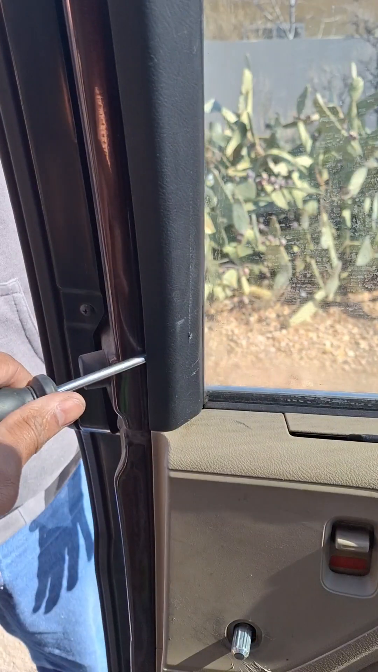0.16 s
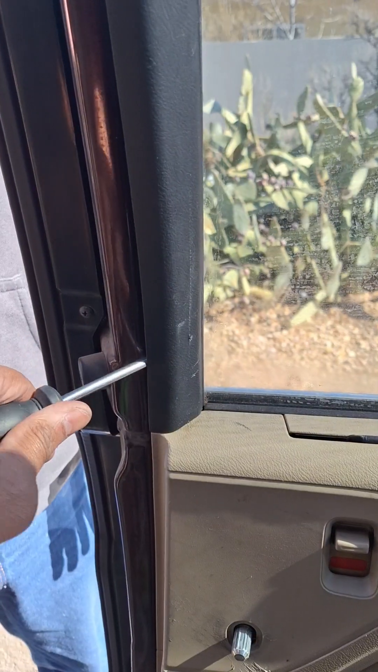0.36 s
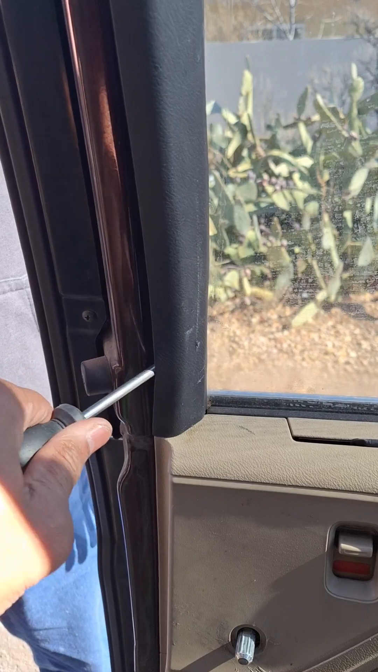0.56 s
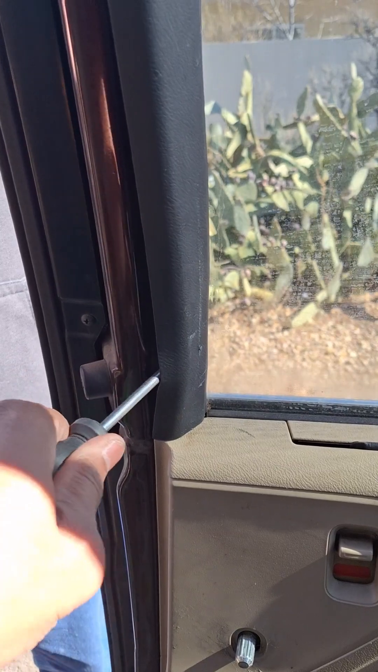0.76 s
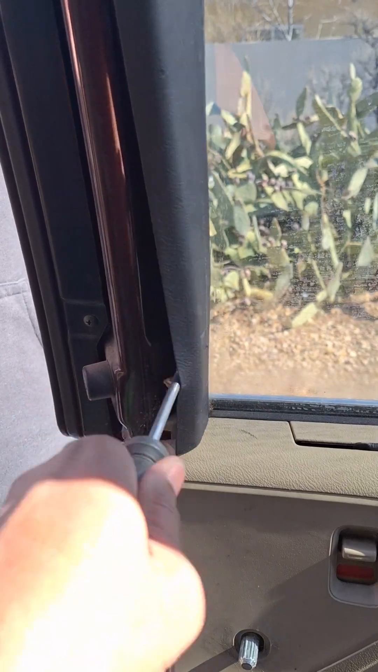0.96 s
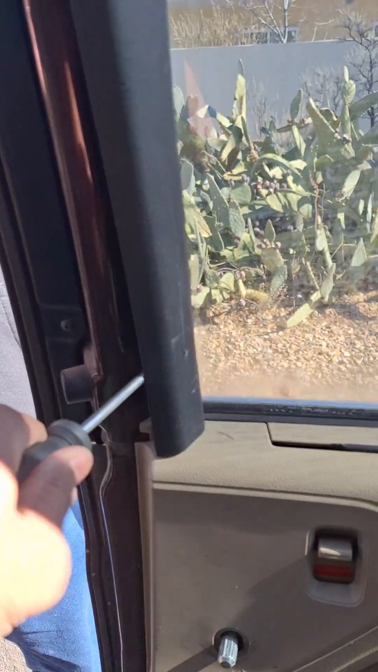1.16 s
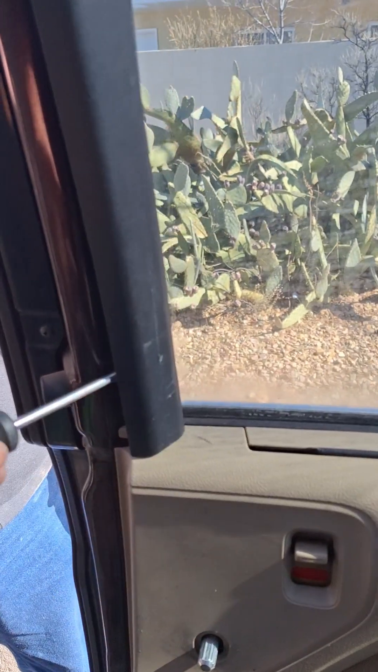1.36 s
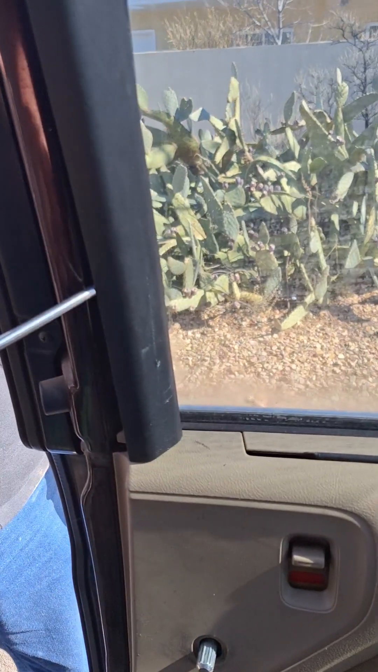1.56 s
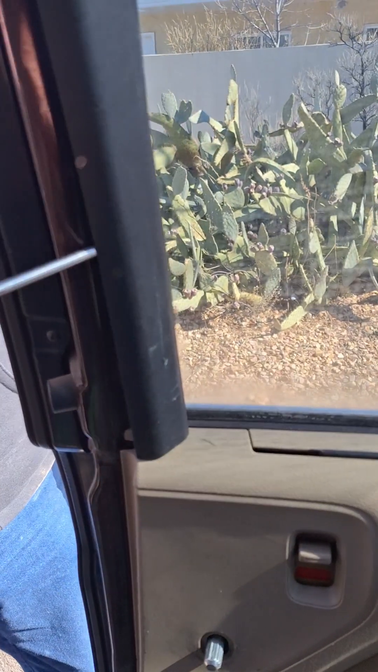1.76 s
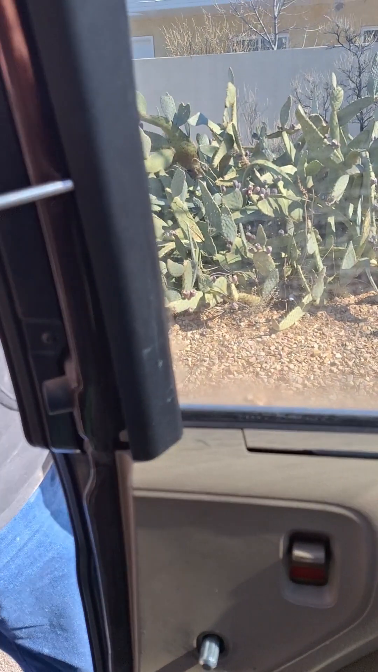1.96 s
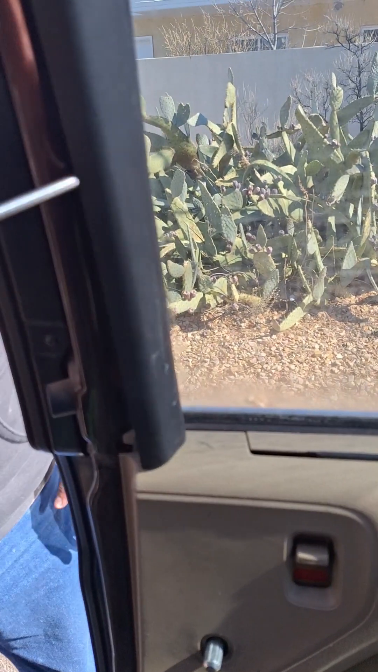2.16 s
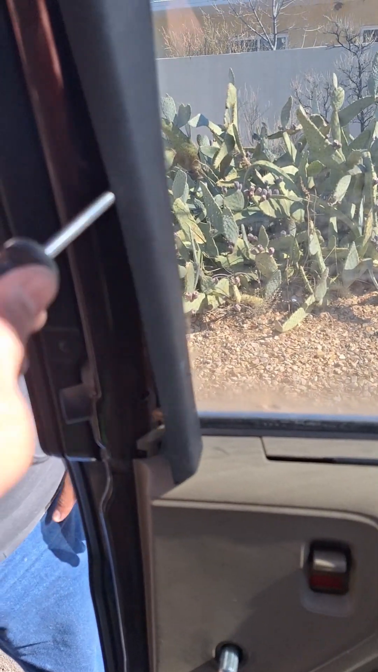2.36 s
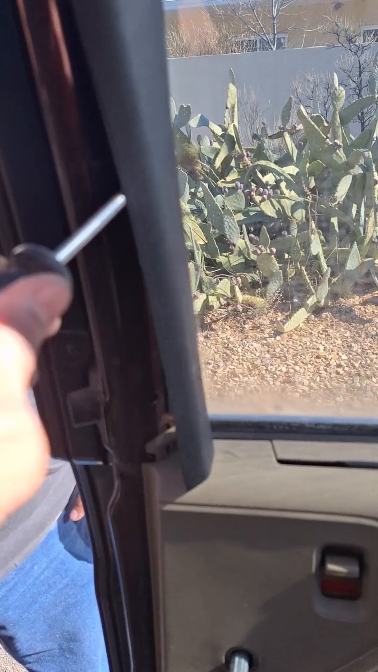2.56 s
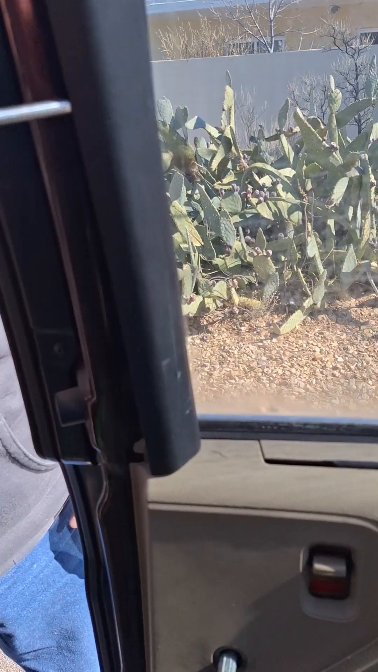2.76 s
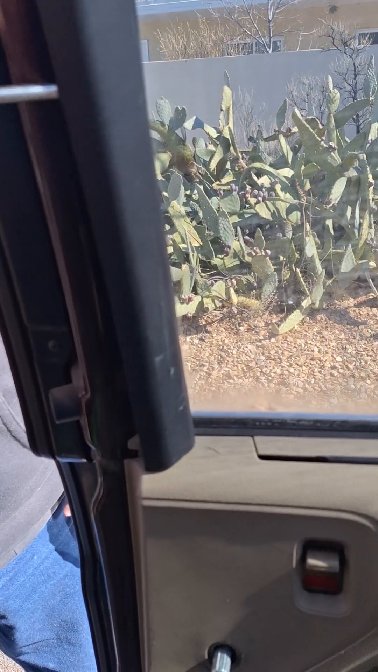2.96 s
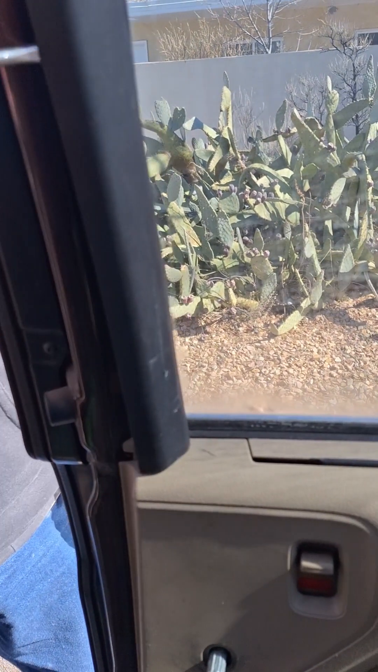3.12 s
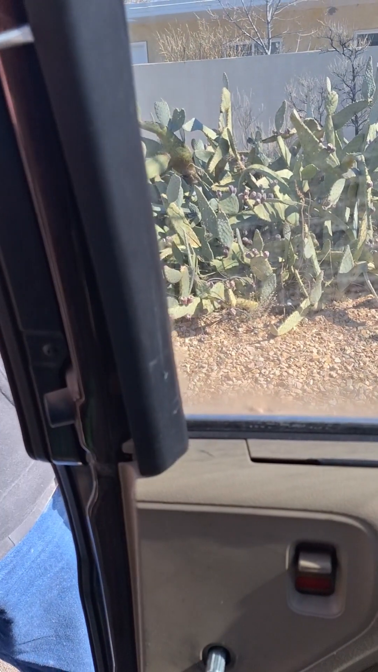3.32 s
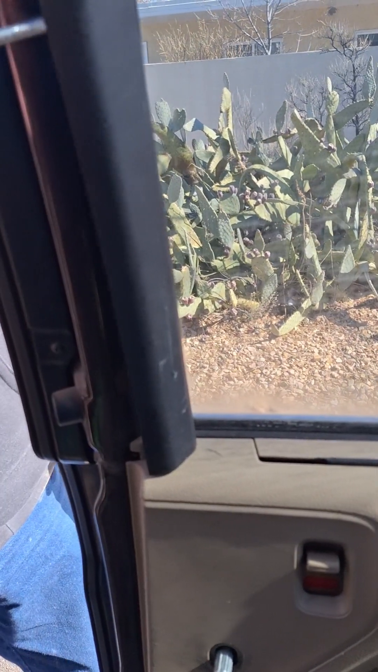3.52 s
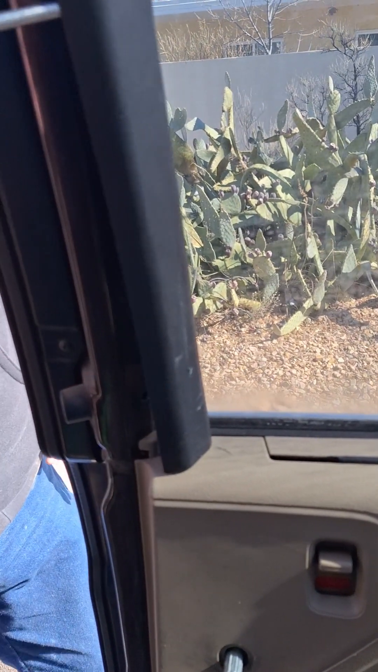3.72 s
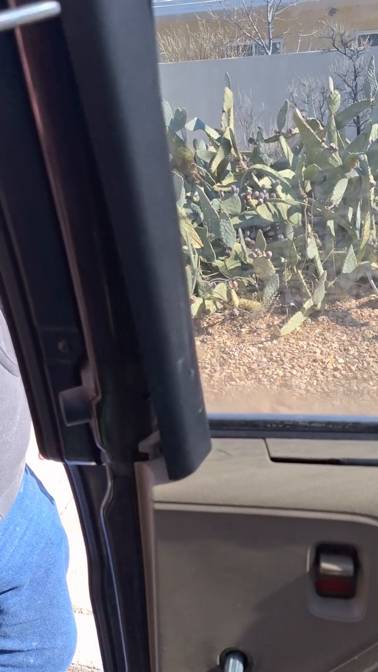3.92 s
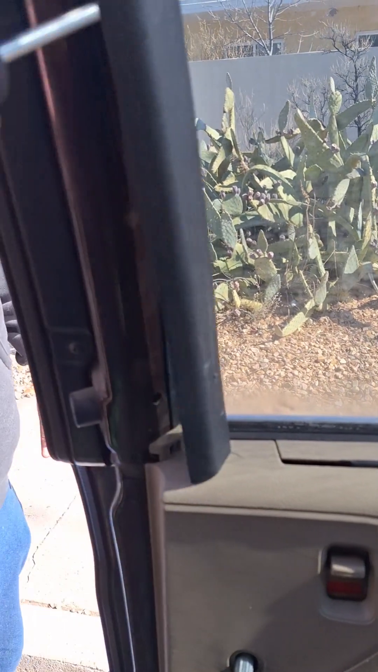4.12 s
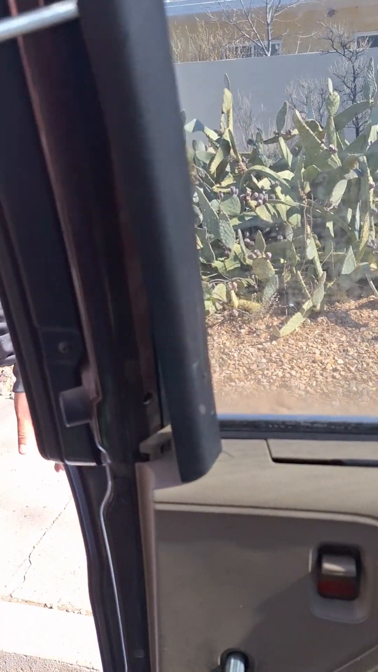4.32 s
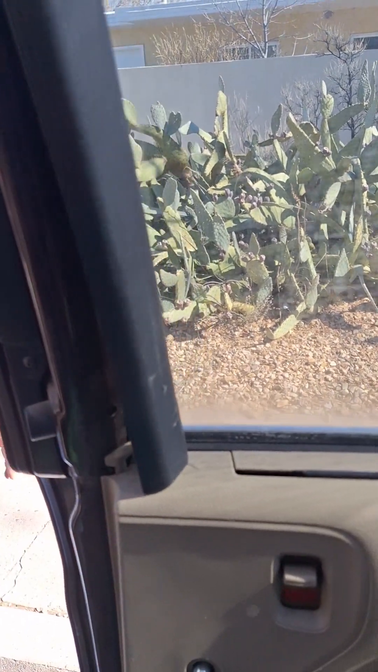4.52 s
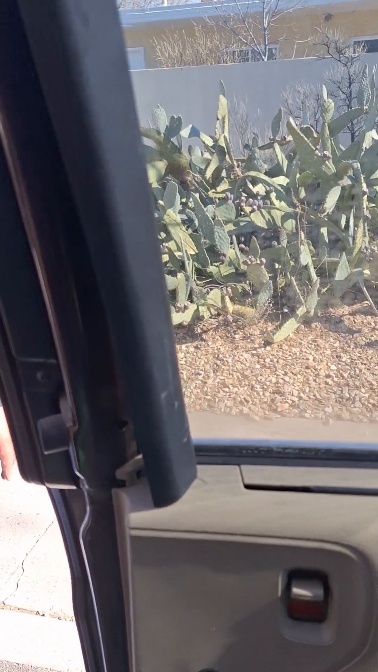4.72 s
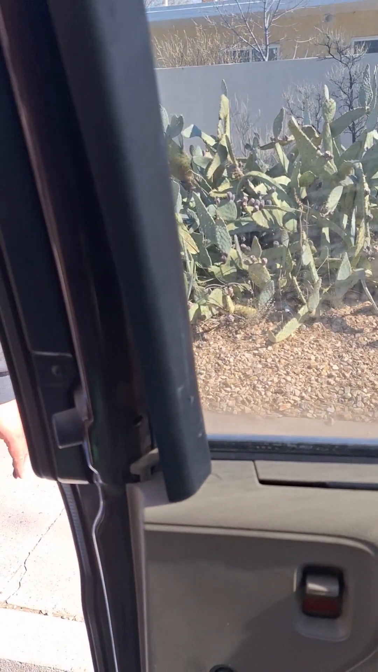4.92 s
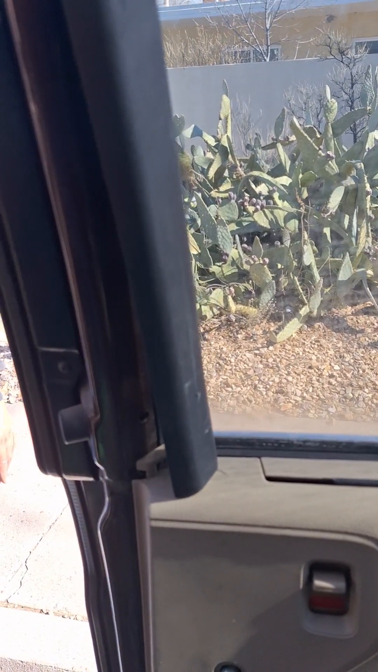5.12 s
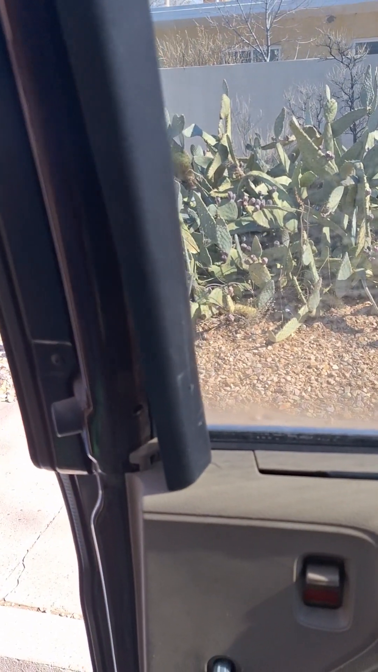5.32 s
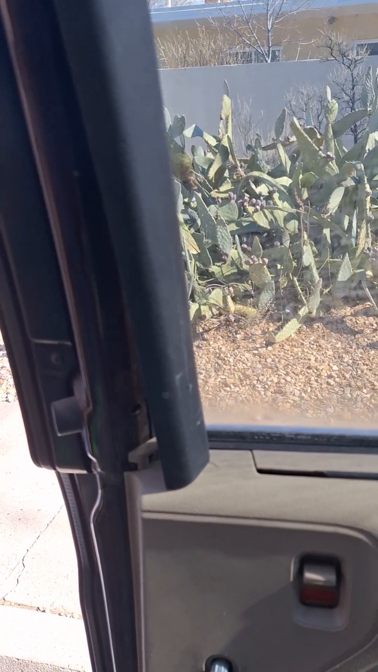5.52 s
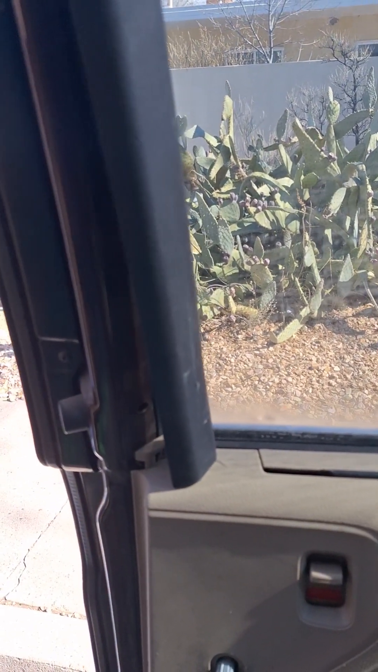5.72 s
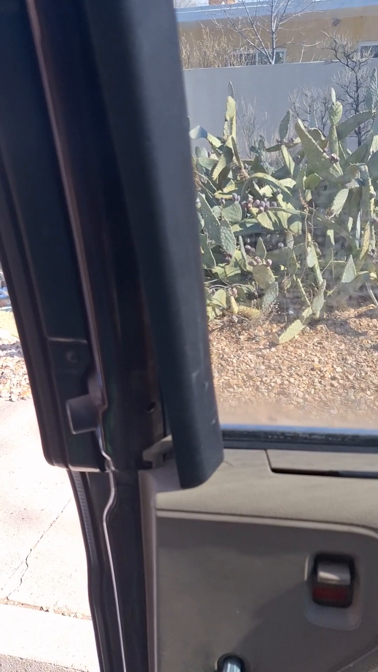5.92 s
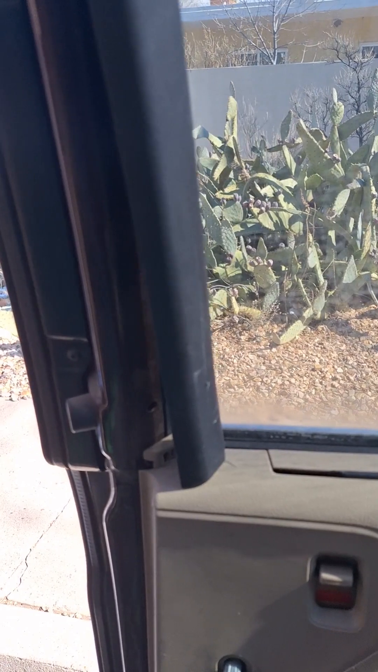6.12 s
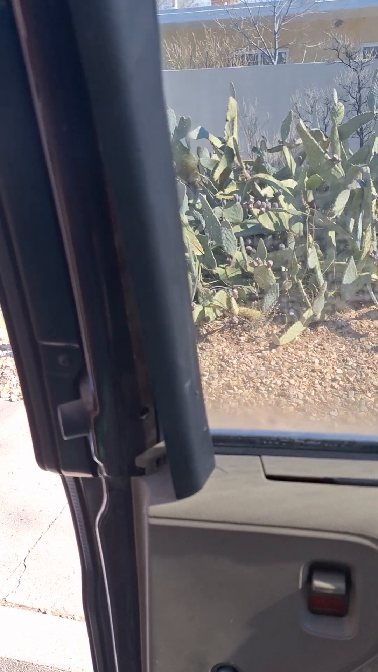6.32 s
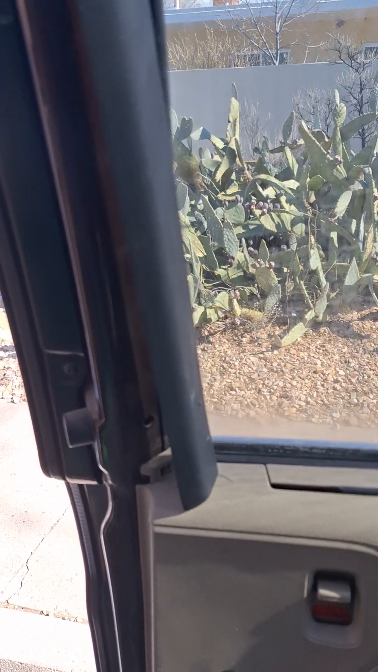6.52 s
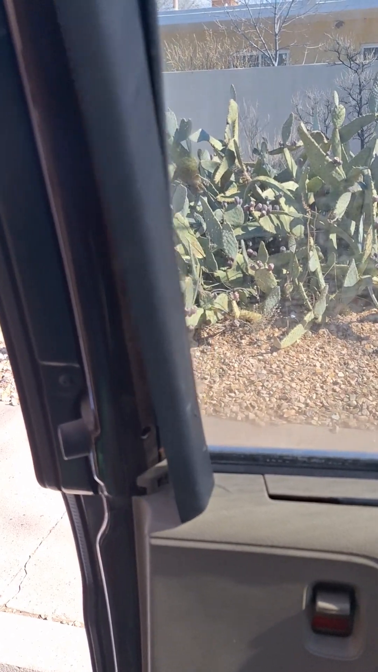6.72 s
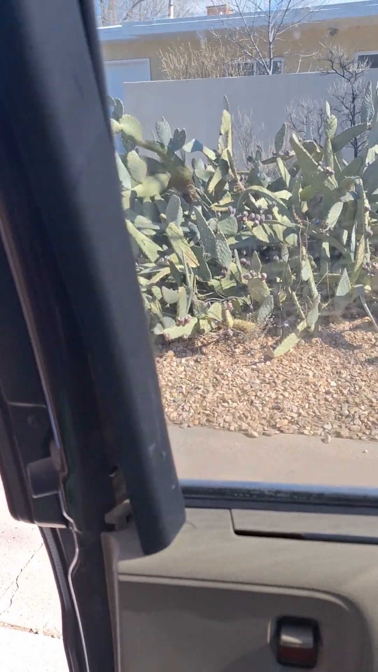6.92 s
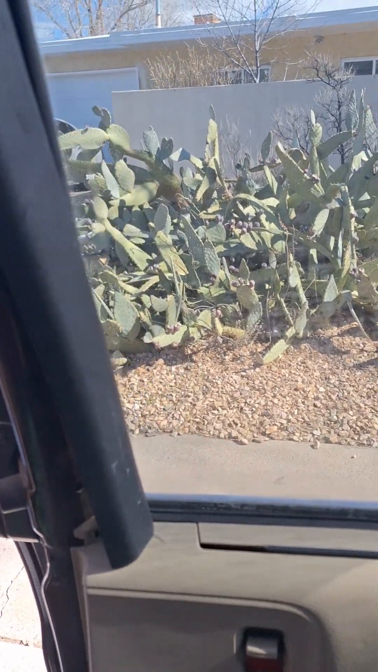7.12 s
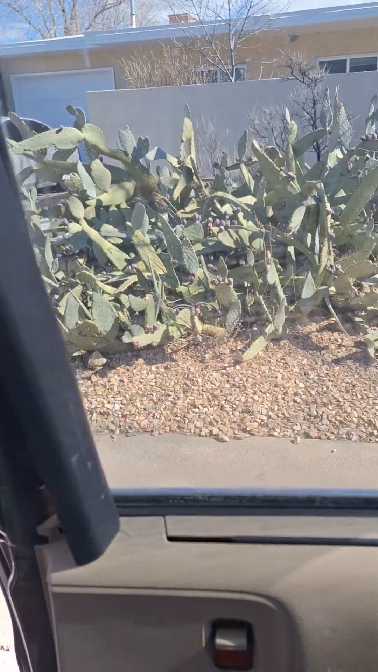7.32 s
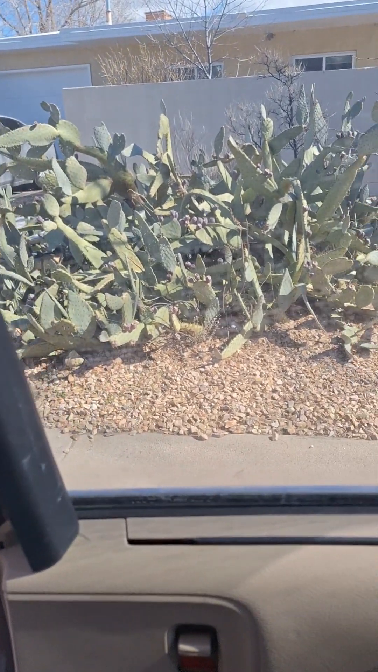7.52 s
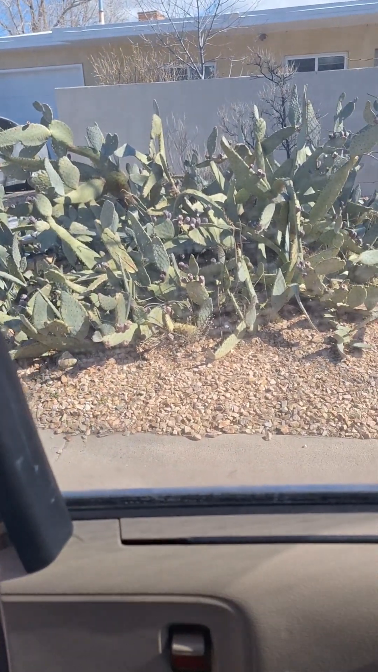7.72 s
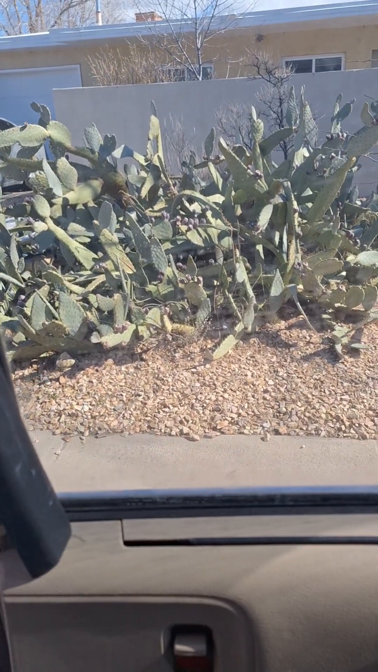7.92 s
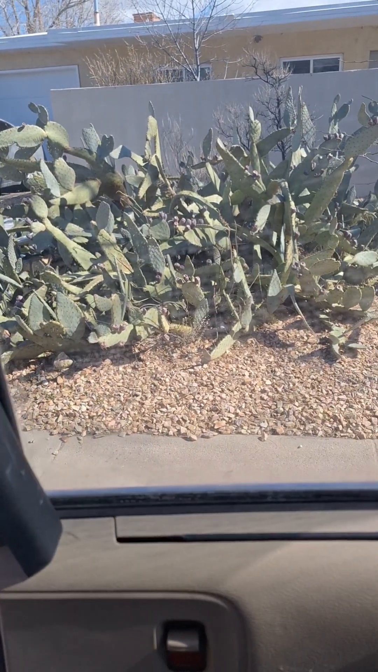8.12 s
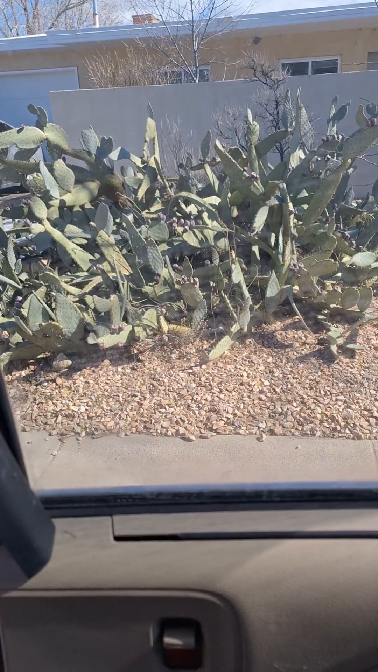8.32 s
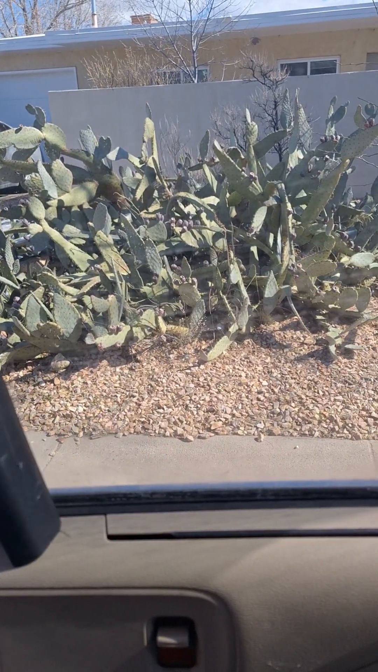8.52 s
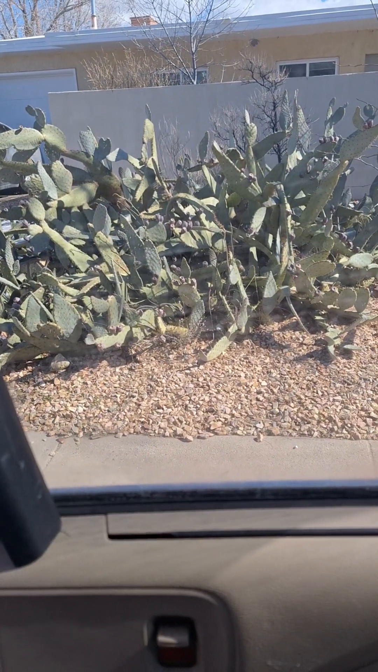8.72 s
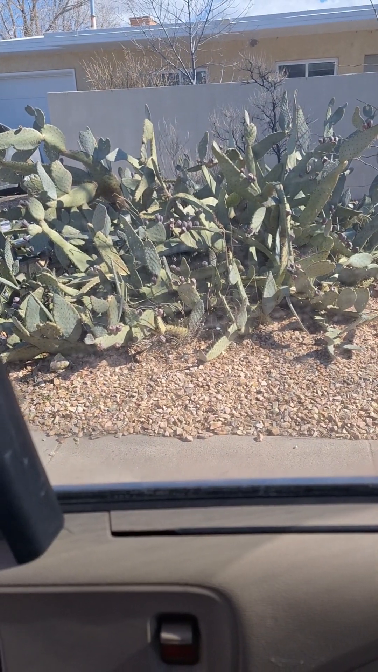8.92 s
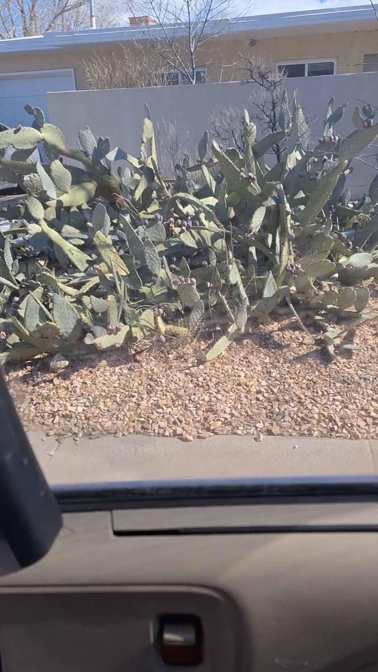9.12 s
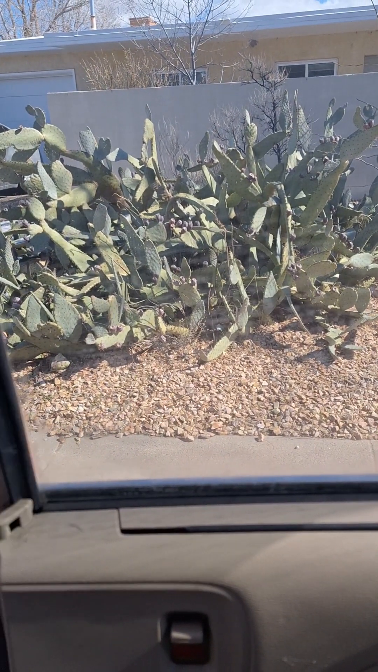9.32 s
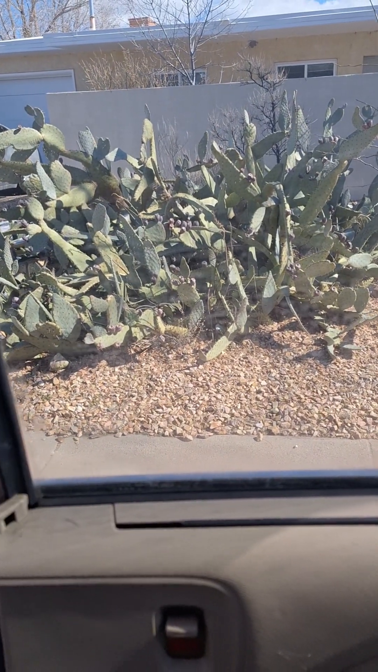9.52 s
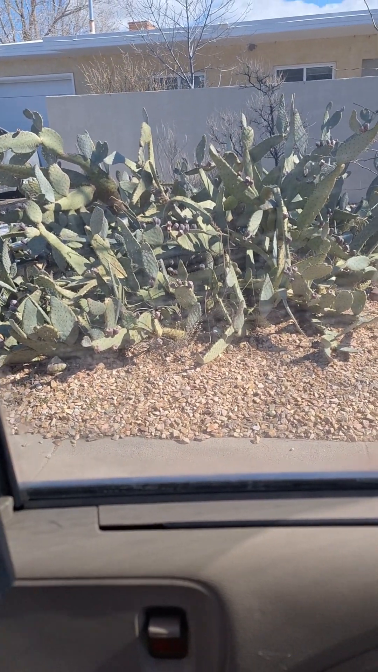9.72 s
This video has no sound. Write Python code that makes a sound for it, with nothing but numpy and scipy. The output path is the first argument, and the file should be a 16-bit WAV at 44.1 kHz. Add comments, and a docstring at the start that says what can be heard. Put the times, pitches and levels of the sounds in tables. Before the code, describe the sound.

Close inside a small car, door open, very faint traffic rumble and occasional tiny bird chirps lie behind the work. After a weak click at 0.5 s, a cluster of loud, dry plastic cracks and hollow knocks bursts at 0.9-1.15 s, with a low door shudder. From 1.4 to 3.6 s it is quiet: soft rubbing, small ticks, a short scrape near 2.7 s. A low grip bump on the left comes at 3.7 s; firm knocks at 4.1 s and a bright snap at 4.5 s follow. A lull, then rubbing and knocks from 5.4 s, sharp pops at 6.3 s and 6.8 s. From 7.5 s loose plastic clatters and scrapes irregularly, strongest around 8.4 s, where a thin high squeak lasts until 8.7 s. Lighter ticks and rubbing follow, with final rattling knocks near 9.8 s.

```python
'''Trim levered off a car's door pillar

A screwdriver frees plastic clips: snaps, knocks, scrapes and ticks are noise forces ringing the trim's modes.
The pillar thumps in low sines; door shudders and grip thuds are enveloped low noise. Sleeves and plastic
rub as coloured noise, an edge squeaks as narrow-band noise, and the small cabin echoes the contacts.
Through the open door come far traffic (coloured noise) and a few small birds (gliding sines).'''
import sys
import numpy as np
from scipy import signal
from scipy.fft import rfft, irfft, next_fast_len
from scipy.io import wavfile
from scipy.ndimage import uniform_filter1d, map_coordinates

SR = 44100
rng = np.random.default_rng(int(sys.argv[2]) if len(sys.argv) > 2 else 0)


def transcribe(u):
    """Save the signal u as a 16-bit wav file named by the first command-line argument.

    u: samples, shape (n,) or (channels, n), limited to [-1, 1]; the rate is SR.
    q: integer samples, one column per channel.
    """
    v = np.clip(np.atleast_2d(u).T, -1, 1)
    q = np.round(v * 32767).astype(np.int16)
    wavfile.write(sys.argv[1], SR, q)


N = 435266

# All event levels are before the source and mix gains.
# Snaps and knocks: (time [s], knock [dB], ring [dB], crack [dB], knock pitch [Hz], ring pitch [Hz], t60 [s])
SNAPS = [(0.557, -48, -48, -57, 680, 2310, 0.049), (0.93, -19.5, -15.5, -24, 1040, 1910, 0.033),
         (0.9358, -14.5, -24.5, -29, 440, 1770, 0.04), (0.946, -27, -19, -26.5, 404, 2360, 0.048),
         (0.978, -19.5, -16, -36, 573, 1367, 0.049), (1.011, -31, -53.5, -52, 610, 1380, .055),
         (1.1242, -24.5, -18, -30.5, 876, 1454, 0.025), (1.131, -22.5, -33, -35, 753, 1600, .05),
         (1.212, -64, -62, -68, 500, 1510, .04), (1.576, -47.5, -47.5, -63.5, 1016, 1540, 0.044),
         (1.846, -45, -42, -58, 537, 1390, 0.057), (2.379, -49.5, -60, -63.5, 617, 1590, 0.033),
         (2.481, -51, -69, -70.5, 444, 1470, .04), (2.744, -36, -32.5, -45.5, 807, 1500, 0.086),
         (3.203, -54.5, -52.5, -52.5, 600, 1850, .09), (3.643, -38, -34, -51, 590, 1540, 0.054),
         (4.028, -42, -53, -67, 290, 1560, 0.06), (4.112, -19.5, -22.5, -29.5, 280, 2200, .07),
         (4.138, -23, -33.5, -37.5, 420, 1950, 0.059), (4.476, -31.5, -17.5, -22, 520, 1870, 0.04),
         (4.5, -34.5, -39.5, -33.5, 520, 1980, 0.045), (4.539, -33.5, -39, -39, 518, 1716, 0.05),
         (5.448, -37, -38.5, -52, 345, 1480, 0.043), (5.573, -37.5, -46.5, -62.5, 343, 1650, 0.054),
         (5.65, -43.5, -36.5, -52.5, 535, 1660, 0.067), (5.977, -32.5, -38.5, -43.5, 976, 1210, 0.14),
         (6.256, -44, -52.5, -45, 338, 1840, 0.013), (6.278, -39.5, -18, -25.5, 383, 2200, .042),
         (6.283, -23, -33, -28.5, 285, 1650, .048), (6.344, -25.5, -32.5, -48, 790, 1710, 0.054),
         (6.376, -40, -51.5, -56, 660, 1560, 0.041), (6.796, -29.5, -21, -21.5, 303, 1628, 0.047),
         (7.339, -43, -56, -68.5, 684, 1130, 0.027), (7.502, -39.5, -48.5, -72.5, 890, 1080, 0.024),
         (7.603, -30.5, -27.5, -28, 640, 1474, 0.048), (7.64, -35.5, -37.5, -49.5, 486, 1400, 0.13),
         (7.668, -31, -26.5, -36.5, 630, 1420, .095), (7.919, -26.5, -33, -36, 770, 1820, 0.066),
         (7.984, -31, -29.5, -24.5, 435, 1860, 0.026), (8.083, -50.5, -49.5, -61.5, 597, 1570, .04),
         (8.188, -30, -34, -44, 694, 1440, .07), (8.194, -60, -40, -43, 710, 1500, 0.018),
         (8.232, -31.5, -26, -31, 407, 1600, 0.036), (8.361, -57, -52, -50.5, 600, 1430, 0.03),
         (8.39, -27, -20, -27.5, 780, 1600, .1), (8.412, -21.5, -24, -30, 690, 1510, .06),
         (8.482, -30, -42.5, -49, 273, 1280, .05), (8.715, -55, -53, -42.5, 735, 2150, .05),
         (8.857, -58, -47, -39.5, 940, 2230, 0.018), (8.907, -50, -49, -61.5, 604, 1500, .05),
         (9.018, -45.5, -46.5, -59, 990, 1670, 0.054), (9.136, -47.5, -54, -32.5, 890, 2150, 0.025),
         (9.253, -33.5, -43, -43, 530, 1170, 0.058), (9.292, -35.5, -31, -38, 780, 2220, .05),
         (9.321, -43.5, -36.5, -33, 644, 2100, .045), (9.573, -63.5, -74, -66, 602, 1960, .015),
         (9.776, -27, -27, -46.5, 740, 1280, .065), (9.824, -42, -43, -51.5, 298, 1930, .04),
         (9.853, -31.5, -29, -33, 307, 1580, .06)]
# Plastic dragging on the pillar: (time [s], length [s], knock [dB], ring [dB], crack [dB])
SCRAPES = [(1.776, .12, -51.5, -58, -71), (2.683, .085, -42, -48, -56), (3.585, .06, -44, -55, -60),
           (3.646, .034, -38, -45.5, -51), (4.419, 0.044, -50, -58.5, -61), (5.253, .06, -58, -44.5, -53),
           (6.16, 0.13, -66.5, -63, -70), (6.817, .07, -34, -43, -49), (7.515, .04, -52, -55, -59.5),
           (7.66, .052, -33.5, -52, -56), (7.94, 0.026, -31.5, -43, -47), (8.158, 0.036, -38.5, -42, -61),
           (8.614, .09, -43.5, -42.5, -54.5), (8.953, 0.033, -42, -43, -54.5),
           (9.27, .088, -36, -44.5, -49), (9.673, .05, -51.5, -49, -54.5), (9.785, .026, -51, -59, -46)]
# Trim resonances: (centre [Hz], width [Hz], gain [dB])
TRIM_MODES = [(195, 51, 4.5), (284, 100, -0.5), (365, 63, -0.5), (490, 57, 3), (626, 57, -1.5),
              (720, 130, -4.5), (1065, 57, -10), (1160, 36, -7), (1530, 300, -3.5), (1780, 230, -2),
              (2080, 58, -6.5), (2850, 260, -10.5), (3226, 530, -2), (3870, 260, -6), (5020, 630, 1),
              (6600, 61, -16.5), (8300, 3500, -7), (10900, 1000, -7), (14800, 4100, 2.5)]
# Bands of knock, ring, crack and tick: (low [Hz], high [Hz])
CONTACT_BANDS = [(140, 1000), (1000, 2600), (2600, 8000), (8000, 16000)]
# Bird notes: (time [s], length [s], start [Hz], end [Hz], level [dB])
BIRD_NOTES = [(0.243, .05, 3300, 3830, -72), (0.346, .06, 3310, 3400, -66), (.49, 0.033, 4220, 3440, -66),
              (.63, 0.053, 3420, 2820, -74), (1.047, 0.087, 2970, 3300, -69),
              (1.551, 0.14, 5260, 4390, -73), (1.972, 0.075, 3320, 4170, -73),
              (2.137, .07, 3420, 2990, -70), (2.372, 0.073, 4030, 3540, -69.5),
              (2.555, 0.058, 2900, 2750, -78), (2.923, 0.047, 3690, 3680, -67),
              (3.249, 0.051, 3330, 3080, -61), (4.819, .14, 6120, 4440, -83),
              (4.916, 0.097, 4280, 3220, -74), (5.001, .07, 2976, 2920, -79), (6.19, 0.05, 3330, 3750, -69),
              (6.489, 0.055, 3270, 3200, -71), (9.478, .032, 3980, 3500, -70)]
# Low rumble of door, grip and drone: (frequency [Hz], density [dB per Hz])
RUMBLE_SPECTRUM = [(13, -46.5), (22, -29), (48, -5), (91, 0.5), (143, -12), (177, -18.5), (400, -44.5),
                   (520, -71), (880, -120)]
# Low part of the rubbing: (frequency [Hz], density [dB per Hz])
BODY_SPECTRUM = [(120, -27.5), (200, 5), (343, -5), (496, -5.5), (549, -0.5), (865, -11.5), (1300, -14),
                 (1690, -43.5), (2860, -120)]
# Middle part of the rubbing: (frequency [Hz], density [dB per Hz])
SWISH_SPECTRUM = [(530, -32.5), (900, -4), (1320, -2.5), (1610, 2.5), (1950, -2.5), (2200, -2),
                  (2570, -6.5), (4500, -12), (5850, -45), (9900, -120)]
# Top part of the rubbing: (frequency [Hz], density [dB per Hz])
HISS_SPECTRUM = [(2060, -27.5), (3500, -3.5), (4750, -6), (5130, -5), (7180, -4), (9140, -9.5), (15100, -9),
                 (16000, -25)]
# Far traffic: (frequency [Hz], density [dB per Hz])
STREET_SPECTRUM = [(15, -36.5), (25, -20), (64, -0.5), (92, -3.5), (277, -17), (335, -23.5), (641, -22.5),
                   (1160, -35), (2220, -55), (3620, -49), (5880, -56), (14800, -53.5), (16000, -56.5)]
# Left port faces the work, right is shaded: (frequency [Hz], left minus right [dB])
PORT_SHADE = [(150, -4), (300, 3), (700, 1), (1400, -3.5), (2200, 2), (4000, 2.5), (8000, 13), (11000, 5.5),
              (14000, 28.5)]
# Cabin echo decay: (frequency [Hz], t60 [s])
CABIN_DECAY = [(150, 0.67), (500, 0.092), (2000, 0.092), (12000, 0.021)]
# Strokes of sleeve and trim: (time [s], length [s], swish [dB], hiss [dB])
STROKES = [(0.035, 0.054, -73, -72), (0.373, 0.27, -67, -75.5), (1.404, 0.22, -68, -70),
           (1.699, 0.37, -65, -72.5), (2.044, .08, -59.5, -63.5), (2.185, 0.29, -71, -75.5),
           (2.589, 0.28, -60, -64), (2.8, 0.14, -67.5, -69), (2.962, 0.06, -58.5, -62),
           (3.107, 0.064, -52.5, -55), (3.23, 0.19, -62.5, -64), (3.504, 0.19, -58.5, -64.5),
           (3.764, 0.084, -55, -61.5), (3.905, 0.31, -64.5, -73), (4.186, .11, -58.5, -67),
           (4.377, 0.19, -64, -62.5), (5.242, 0.039, -50, -64), (5.34, 0.27, -73.5, -79),
           (5.662, 0.22, -51, -57), (5.891, 0.067, -44, -48), (6.04, .16, -68, -73.5),
           (6.212, 0.23, -61.5, -66), (6.462, 0.51, -74.5, -72), (6.691, 0.28, -57, -61.5),
           (6.897, 0.42, -67.5, -67.5), (7.374, 0.031, -56.5, -67), (7.482, 0.42, -58.5, -59.5),
           (7.86, 0.12, -48.5, -58), (8.077, .17, -49.5, -56.5), (8.353, 0.42, -51, -52.5),
           (8.918, 0.073, -60, -62.5), (9.053, 0.12, -54, -55.5), (9.24, 0.15, -55.5, -57.5),
           (9.437, 0.36, -79.5, -70.5), (9.66, 0.14, -51.5, -54)]
# Shifts of the grip: (time [s], length [s], level [dB], left minus right [dB])
GRIPS = [(2.809, 0.019, -33, 9), (2.899, 0.019, -27.5, 17), (3.566, 0.033, -30, 7),
         (3.692, 0.017, -15.5, 21), (3.755, 0.098, -25.5, 13), (4.082, 0.13, -22.5, 19.5),
         (4.395, 0.12, -23.5, 28), (4.6, 0.14, -45, 20.5), (5.599, 0.17, -40.5, 20),
         (5.813, 0.022, -30, 12), (5.933, 0.14, -33, 10), (6.49, 0.058, -20.5, 24.5), (6.61, 0.12, -32, 21),
         (7.319, 0.034, -42, -14), (7.489, 0.026, -34.5, -20), (7.985, 0.11, -35, -3.5),
         (8.198, 0.022, -34, 12), (8.911, 0.033, -37.5, 4), (9.81, .05, -38.5, 16.5)]
# Door shudders as the trim springs back: (time [s], level [dB])
SHUDDERS = [(0.929, -31.5), (1.12, -26.5), (4.112, -30.5), (5.96, -31.5), (6.285, -24.5), (6.798, -35.5),
            (7.92, -31), (8.41, -25), (9.3, -28)]
# Prominence of a snap's pitches: knock [dB], ring [dB], crack [dB]
SNAP_RINGS_DB = [7, 5.5, -5.5]

TOP_HZ = 15950
CRACK_HZ, CRACK_SPREAD_LOG = 3400, .1  # crack pitch and its spread between snaps
# Top band re crack at this t60; extra gain per halving of t60
TICK_DB, TICK_T60_S, TICK_DB_PER_OCT = -10, .05, 4
SCRAPE_HZ, SCRAPE_TICK_DB = 1590, -4.5  # dragged edge's main ring; top band re crack
REST_DB = -83  # cloth is never quite still
GRIP_ATTACK_S, GRIP_T60_S = 0.016, 0.33
SHUDDER_ATTACK_S, SHUDDER_HOLD_S, SHUDDER_T60_S = 0.017, 0.021, 0.71
# Rise time, plus this share of the stroke length; t60 afterwards
STROKE_RISE_S, STROKE_RISE_SHARE, STROKE_T60_S = 0.08, .15, .3


def amp(db):
    """Decibels to gain."""
    return 10 ** (np.asarray(db) / 20)


def unit(x):
    """Scale x to rms 1."""
    return x / np.sqrt(np.mean(x ** 2) + 1e-30)


def along(points, hz):
    """Interpolate (frequency [Hz], value) points on a log axis."""
    f, v = np.transpose(points)
    return np.interp(np.log(hz + 1), np.log(f + 1), v)


def curves(rows):
    """One value per sample for each column after the time."""
    time_s, *columns = np.transpose(rows)
    return [np.interp(np.arange(N) / SR, time_s, column) for column in columns]


def wobble(rate_hz):
    """Smooth random curve, rate_hz knots a second."""
    knots = rng.standard_normal(int(N * rate_hz / SR) + 4)
    return map_coordinates(knots, [np.arange(N) * rate_hz / SR])


def filtered(x, response):
    """Apply a frequency response, with padding for the tail."""
    n = x.shape[-1]
    m = next_fast_len(n + SR // 8)
    return irfft(rfft(x, m) * response(np.fft.rfftfreq(m, 1 / SR)), m)[..., :n]


def resonance(f, hz, width_hz):
    """Causal response of one damped mode, gain 1 at its centre."""
    return 1j * f * width_hz / (hz * hz - f * f + 1j * f * width_hz)


def balance(db):
    """Left and right gains of mean power 1 for a level difference."""
    gains = amp([db / 2, -db / 2])
    return gains / np.sqrt(np.mean(gains ** 2, axis=0))


def pair(alike, size=N):
    """Two white noises sharing the fraction alike of their power."""
    shared = np.clip(alike, 0, 1)
    common = np.sqrt(shared) * rng.standard_normal(size)
    return common + np.sqrt(1 - shared) * rng.standard_normal((2, size))


def noise(spectrum, alike):
    """Coloured stereo noise of rms 1."""
    return unit(filtered(pair(alike), lambda f: amp(along(spectrum, f))))


def add(track, start_s, sound):
    """Mix a sound into a track at start_s."""
    part = track[:, round(start_s * SR):][:, :sound.shape[-1]]
    part += sound[..., :part.shape[-1]]


def gesture(start_s, length_s, attack_s, t60_s):
    """Power of one movement: a rise over attack_s, and a decay from length_s on."""
    t = np.arange(int((length_s + t60_s) * SR)) / SR
    rise = np.minimum(t / attack_s, 1)
    decay = amp(-60 * np.maximum(t - length_s, 0) / t60_s)
    out = np.zeros((1, N))
    add(out, start_s, (rise * decay) ** 2)
    return out[0]


def rumble(alike):
    """Low noise divided by its running rms, so its strength stays even."""
    air = noise(RUMBLE_SPECTRUM, alike)
    return air / np.sqrt(np.abs(uniform_filter1d(air ** 2, size=3500, axis=1)))


def street():
    """Far traffic: coloured noise with a slowly wandering level."""
    return amp(-54.0 + 1.9 * wobble(1.2)) * noise(STREET_SPECTRUM, alike=0.58)


def drone():
    """Street drone in the cabin: low noise, identical in both ports, wandering in level."""
    return amp(-51.5 + 1.5 * wobble(3)) * noise(RUMBLE_SPECTRUM, alike=1.0)


def birds(level_db=-1, warble=0.017, street_t60_s=0.18):
    """Thin gliding whistles, blurred by the street's walls as a decaying noise response."""
    out, t = np.zeros((2, N)), np.arange(SR // 4) / SR
    flutter = wobble(400)
    for start_s, length_s, start_hz, end_hz, db in BIRD_NOTES:
        u = np.linspace(0, 1, int(length_s * SR))
        glide_hz = start_hz * (end_hz / start_hz) ** u
        hz = glide_hz * (1 + warble * flutter[int(start_s * SR):][:len(u)])
        whistle = np.sin(np.pi * u) * np.sin(2 * np.pi * np.cumsum(hz) / SR)
        add(out, start_s, amp(db + level_db) * 2 * whistle)
    walls = pair(0.14, size=len(t)) * amp(-60 * t / street_t60_s)
    return signal.fftconvolve(out, walls / np.linalg.norm(walls[0]), axes=1)[:, :N]


def handling():
    """Each shift of the grip rumbles, mostly in one port."""
    power = 0
    for start_s, length_s, db, pan_db in GRIPS:
        envelope = gesture(start_s, length_s, GRIP_ATTACK_S, GRIP_T60_S)
        power = power + np.outer((amp(db) * balance(pan_db)) ** 2, envelope)
    return np.sqrt(power) * rumble(alike=.4)


def shudders(pan_db=3):
    """The shaken door and pillar boom into the cabin and settle."""
    power = 0
    for start_s, db in SHUDDERS:
        envelope = gesture(start_s, SHUDDER_HOLD_S, SHUDDER_ATTACK_S, SHUDDER_T60_S)
        power = power + amp(db) ** 2 * envelope
    return balance(np.array([pan_db])) * np.sqrt(power) * rumble(alike=.9)


def thumps(level_db=-7, t60_s=0.17, attack_s=.008, pan_db=4.):
    """Each knock sets the pillar and door swinging in three low modes."""
    out, t = np.zeros((2, N)), np.arange(SR // 3) / SR
    for start_s, knock_db, *_ in SNAPS:
        swing = 0
        for hz in (76, 104, 150):
            strength = rng.normal(1, .4)
            swing = swing + strength * np.sin(2 * np.pi * hz * rng.normal(1, 0.049) * t)
        envelope = amp(knock_db + level_db - 60 * t / t60_s) * (1 - np.exp(-t / attack_s))
        add(out, start_s, envelope * swing)
    return out * balance(np.array([pan_db]))


def sliding():
    """Gains of swish and hiss from all strokes; long strokes gather speed more slowly."""
    power = amp(REST_DB) ** 2
    for start_s, length_s, *levels_db in STROKES:
        rise_s = STROKE_RISE_S + STROKE_RISE_SHARE * length_s
        envelope = gesture(start_s, length_s, rise_s, STROKE_T60_S)
        power = power + np.outer(amp(levels_db) ** 2, envelope)
    return np.sqrt(power)


def patchy(x, depth_db):
    """A sliding contact's colour drifts: random gain patches a few hundred Hz wide."""
    z = signal.stft(x, nperseg=512)[2]
    field = uniform_filter1d(rng.standard_normal(z.shape[1:]), size=4, axis=0)
    field = uniform_filter1d(field, size=18, axis=1)
    return unit(signal.istft(z * amp(depth_db * unit(field)), nperseg=512)[1][:, :N])


def rubbing(swish, hiss, swish_db=-1, hiss_db=-1, catch_db=1.5, drift_db=1):
    """Cloth and plastic slide unevenly: coloured noise with fast catches and slow level drift."""
    catches = unit(amp(catch_db * wobble(68)))
    body = swish * noise(BODY_SPECTRUM, alike=0.27)
    middle = swish * amp(swish_db) * patchy(noise(SWISH_SPECTRUM, alike=0.041), depth_db=1.5)
    top = hiss * amp(hiss_db) * patchy(noise(HISS_SPECTRUM, alike=0.06), depth_db=0.3)
    return amp(drift_db * wobble(12)) * (body + catches * (middle + top))


def squeak(start_s=8.42, end_s=8.69, hz=5800, width_hz=650, db=-53):
    None
    stroke, = curves([(start_s, 0), (start_s + 0.096, 1), (end_s - .03, 1), (end_s, 0)])
    tone = unit(filtered(pair(0.46), lambda f: resonance(f, hz, width_hz) ** 2))
    return amp(db) * stroke * tone


def trim(force, levels_db, length_s, rings_hz, sharpness=15, ring_db=3, direct_db=-12, scatter_db=2.0):
    """The trim's answer to a force; the place of contact picks main rings and mode strengths."""
    strengths_db = rng.normal(0, scatter_db, len(TRIM_MODES))

    def response(f):
        total = amp(direct_db)
        for (hz, width_hz, db), strength_db in zip(TRIM_MODES, strengths_db):
            total = total + amp(db + strength_db) * resonance(f, hz, width_hz)
        for hz, db in np.broadcast(rings_hz, ring_db):
            total = total + amp(db) * resonance(f, hz, hz / sharpness)
        return total

    sound = filtered(force, response)
    out = 0
    # each band's energy equals its level held as rms over length_s
    for band, db in zip(CONTACT_BANDS, levels_db):
        part = signal.sosfilt(signal.butter(4, band, "band", fs=SR, output="sos"), sound)
        out = out + amp(db) * unit(part) * np.sqrt(length_s * SR / part.shape[-1])
    return out


def ticks(swish, hiss, count=34, spread_db=3, t60_s=0.019):
    """Blade and loose edges tick lightly at random, louder when more is moving."""
    out, t = np.zeros((2, N)), np.arange(SR // 20) / SR
    for place, size, tone in rng.random((count, 3)):
        i = int(place * N)
        gains = [swish[i], swish[i], hiss[i], hiss[i] * amp(TICK_DB)]
        levels_db = 20 * np.log10(gains) + spread_db * (2 * size - 1)
        force = pair(0.26, size=len(t)) * amp(-60 * t / t60_s)
        add(out, i / SR, trim(force, levels_db, .02, [1400 + 900 * tone]))
    return out


def scrapes(slip_rate_hz=420, slip_t60_s=0.011, uneven_db=5):
    """The edge sticks and slips at an uneven rate, swelling and easing over the stroke."""
    out, t = np.zeros((2, N)), np.arange(SR // 5) / SR
    for start_s, length_s, knock_db, ring_db, crack_db in SCRAPES:
        levels_db = [knock_db, ring_db, crack_db, crack_db + SCRAPE_TICK_DB]
        gaps, sizes = rng.standard_normal((2, 80))
        times_s = np.cumsum(np.exp(0.3 * gaps)) / slip_rate_hz
        stroke = np.sqrt(np.abs(np.sin(np.pi * times_s / length_s))) * (times_s < length_s)
        strengths = stroke * amp(uneven_db * sizes)
        slips = np.bincount((times_s * SR).astype(int), strengths, len(t))[:len(t)]
        envelope = signal.fftconvolve(slips, amp(-60 * t / slip_t60_s))[:len(t)]
        force = pair(0.54, size=len(t)) * envelope
        add(out, start_s, trim(force, levels_db, length_s, [SCRAPE_HZ], sharpness=11, ring_db=5.5))
    return out


def snaps(crack_t60_s=0.015, chatter_db=-4, chatter_top_hz=5000, softness=0.026, alike=.6, lag_s=.0005):
    """Each release is a brief bright crack over a duller chatter of the plastic on its seat."""
    out, t = np.zeros((2, N)), np.arange(SR // 7) / SR
    dull = signal.butter(1, chatter_top_hz, fs=SR, output="sos")
    for start_s, knock_db, ring_db, crack_db, knock_hz, ring_hz, t60_s in SNAPS:
        crack = pair(alike, size=len(t)) * amp(-60 * t / crack_t60_s)
        chatter = signal.sosfilt(dull, pair(alike, size=len(t))) * amp(chatter_db - 60 * t / t60_s)
        onset = 1 - np.exp(-t / (softness * t60_s))  # a long, loose contact starts more softly
        force = (crack + chatter) * onset
        force[1] = np.interp(t - lag_s, t, force[1], left=0)  # the far port hears it later
        # short contacts are brighter
        tick_db = crack_db + TICK_DB + TICK_DB_PER_OCT * np.log2(TICK_T60_S / t60_s)
        crack_hz = CRACK_HZ * np.exp(CRACK_SPREAD_LOG * rng.standard_normal())
        levels_db = [knock_db, ring_db, crack_db, tick_db]
        rings_hz = [knock_hz, ring_hz, crack_hz]
        add(out, start_s, trim(force, levels_db, .02, rings_hz, ring_db=SNAP_RINGS_DB))
    return out


def cabin(x):
    """Short echo off glass and upholstery: decaying noise whose bass lasts longest."""
    hz, t, z = signal.stft(pair(.2, size=SR // 3), SR, nperseg=256)
    decay = amp(-60 * t / along(CABIN_DECAY, hz)[:, None])
    tail = signal.istft(z * decay, SR, nperseg=256)[1]
    tail = np.pad(tail / np.linalg.norm(tail[0]), ((0, 0), (SR // 250, 0)))  # 4 ms before the echo
    return signal.fftconvolve(x, tail, axes=1)[:, :N]


def ports(x, merge_hz=520):
    """Long waves reach both ports alike; short ones are shaded at the right port."""
    mid = (x[0] + x[1]) / 2
    side = filtered((x[0] - x[1]) / 2, lambda f: f / np.hypot(f, merge_hz))
    return filtered(np.array([mid + side, mid - side]), lambda f: balance(along(PORT_SHADE, f)))


def scene():
    """Work at the pillar, heard from the seat, over the street outside and its drone."""
    swish, hiss = sliding()
    plastic = amp(-1.96) * snaps() + amp(-2.5) * scrapes() + ticks(swish, hiss)
    near = ports(plastic + amp(-13.0) * cabin(plastic) + rubbing(swish, hiss) + squeak())
    far = street() + drone() + birds()
    return far + handling() + shudders() + thumps() + near


def record(dry):
    """Sharp low-pass: nothing passes from TOP_HZ up."""
    return filtered(dry, lambda f: f < TOP_HZ)


dry = scene()
out = record(dry)
transcribe(out)
```